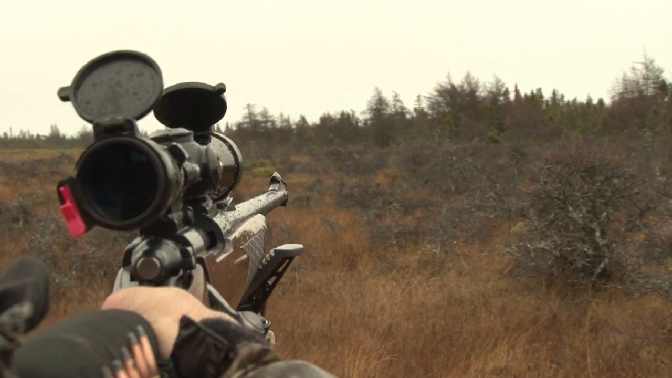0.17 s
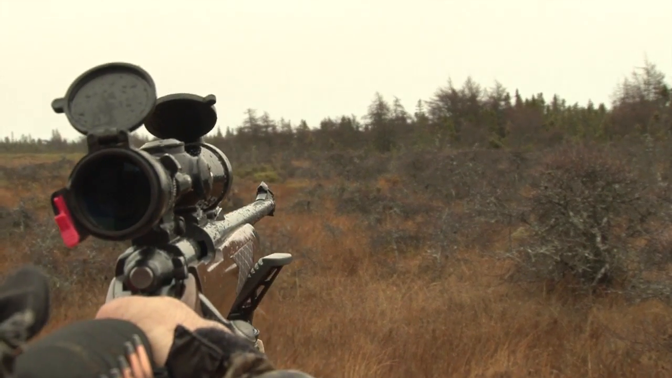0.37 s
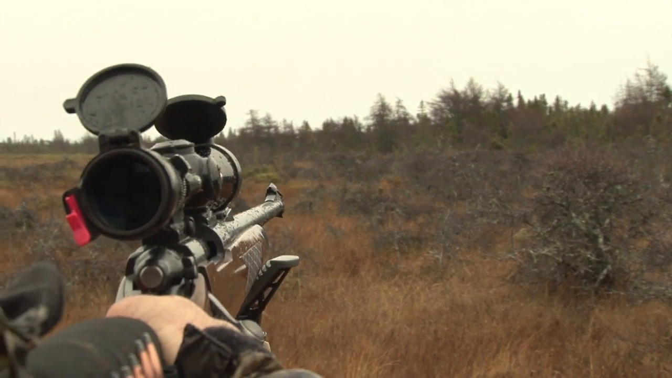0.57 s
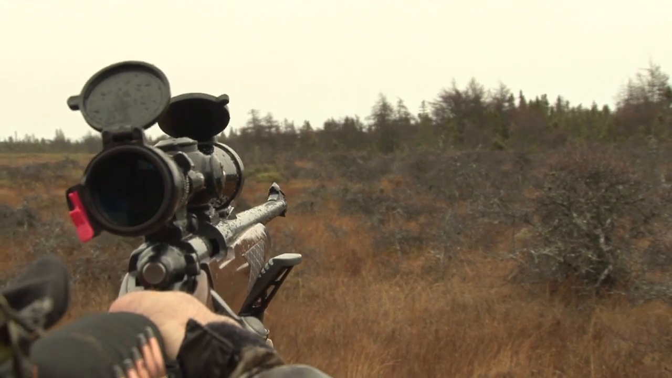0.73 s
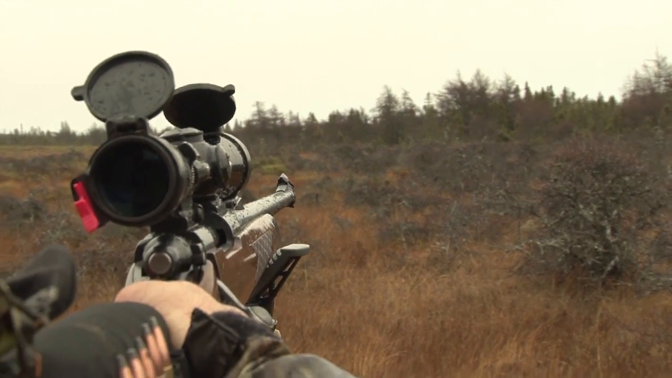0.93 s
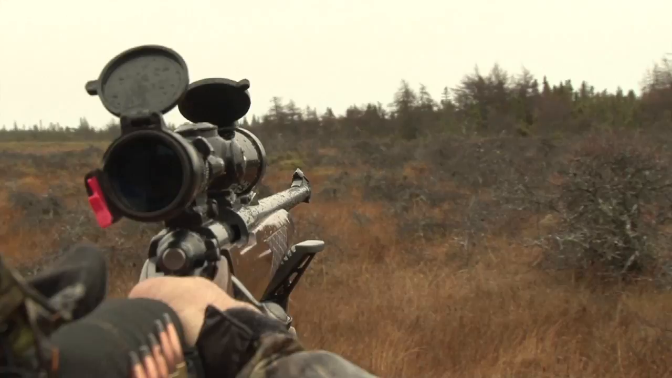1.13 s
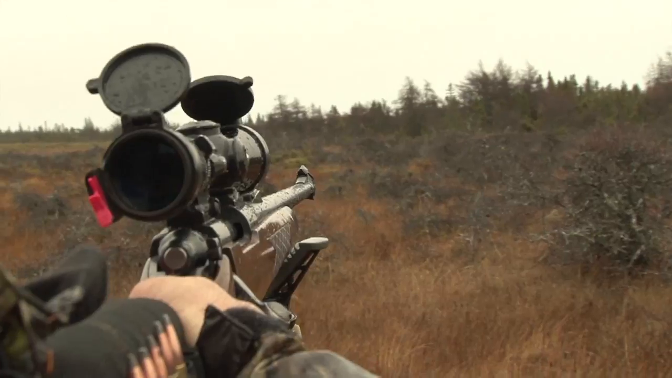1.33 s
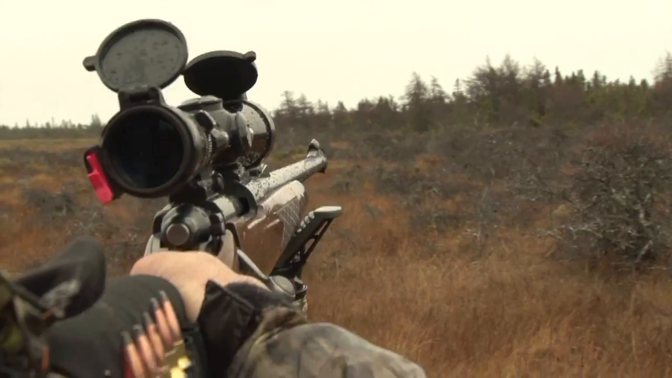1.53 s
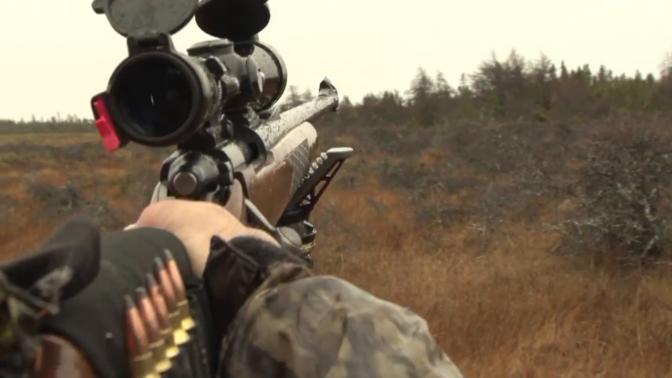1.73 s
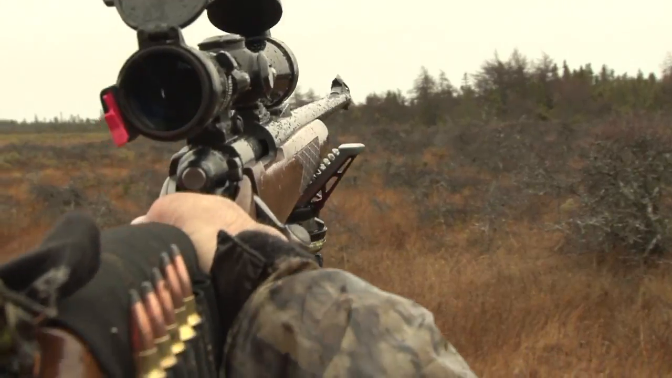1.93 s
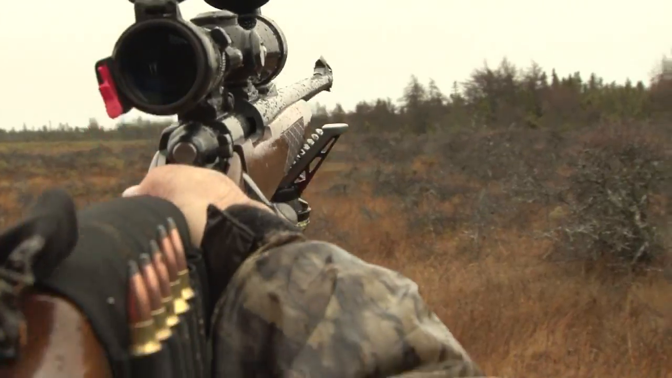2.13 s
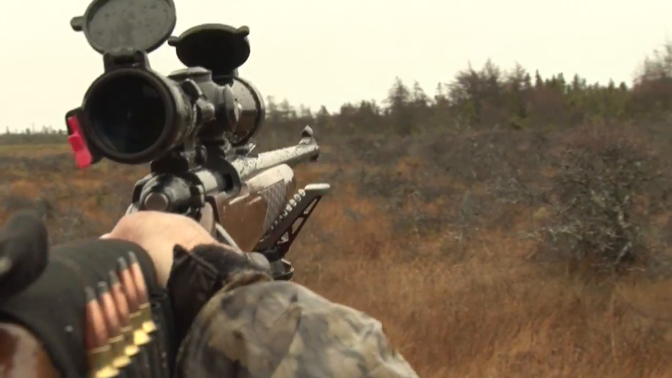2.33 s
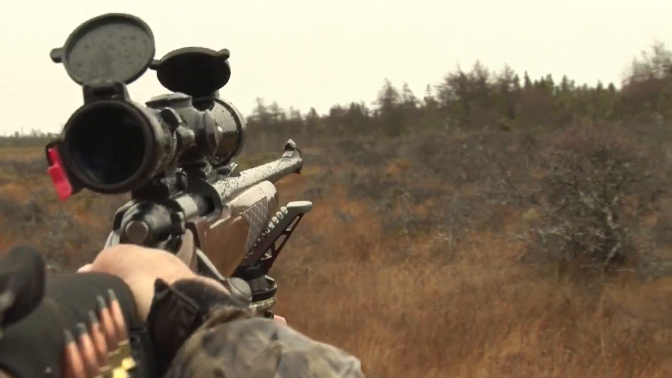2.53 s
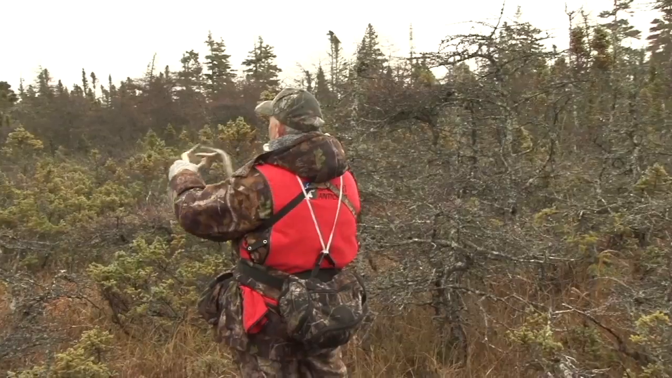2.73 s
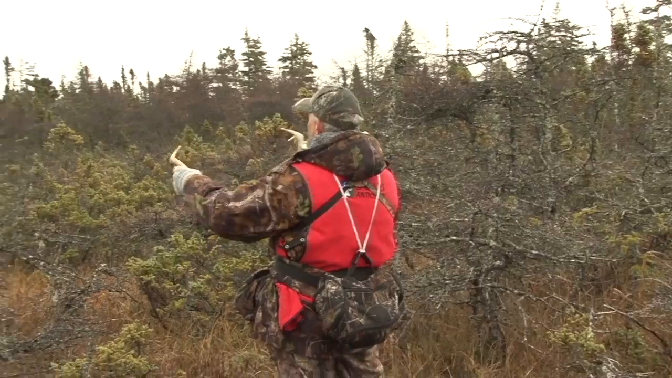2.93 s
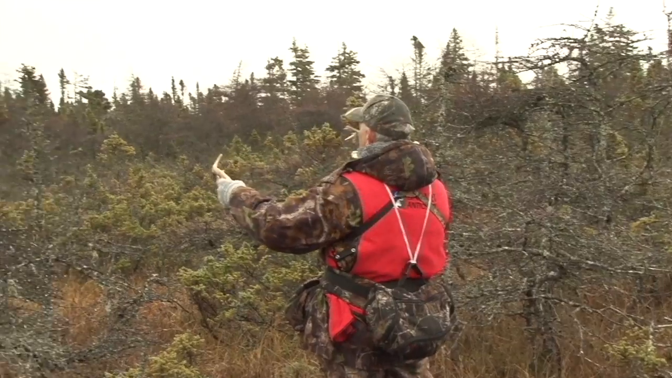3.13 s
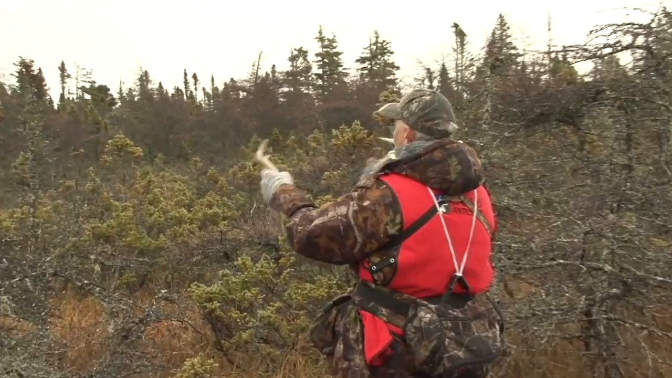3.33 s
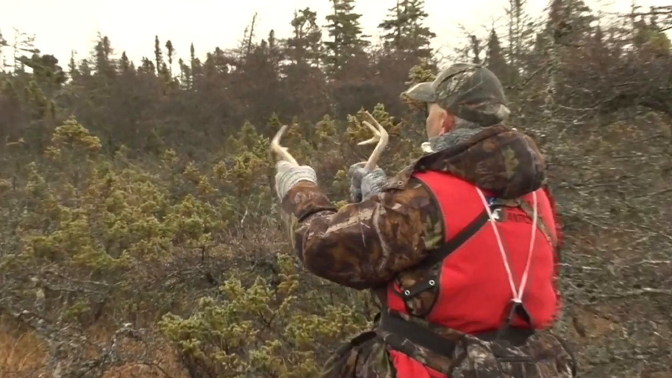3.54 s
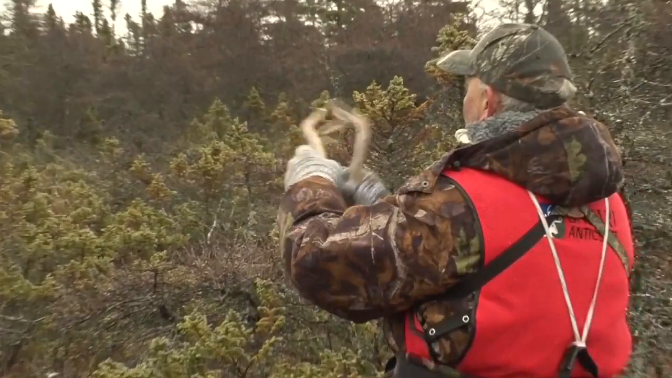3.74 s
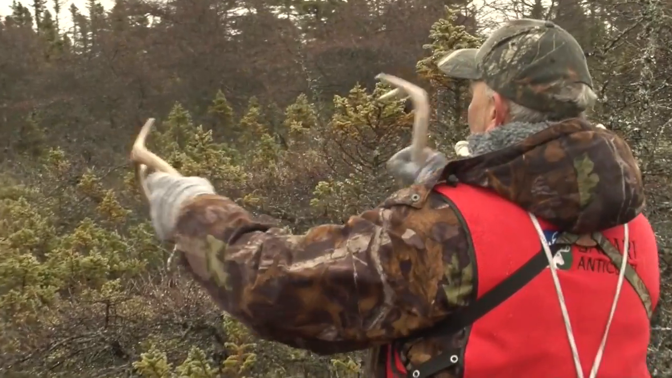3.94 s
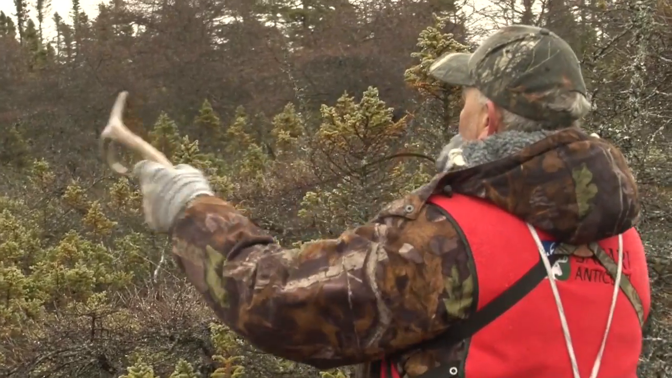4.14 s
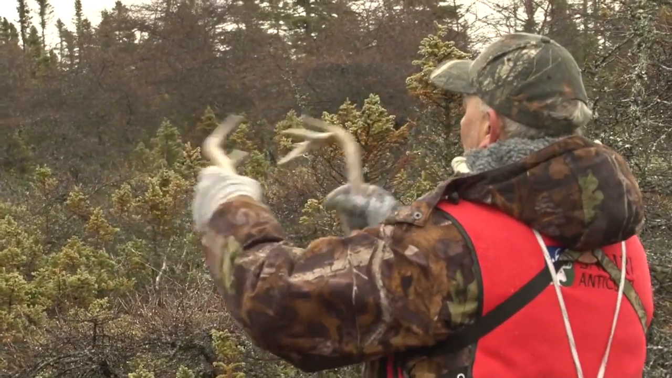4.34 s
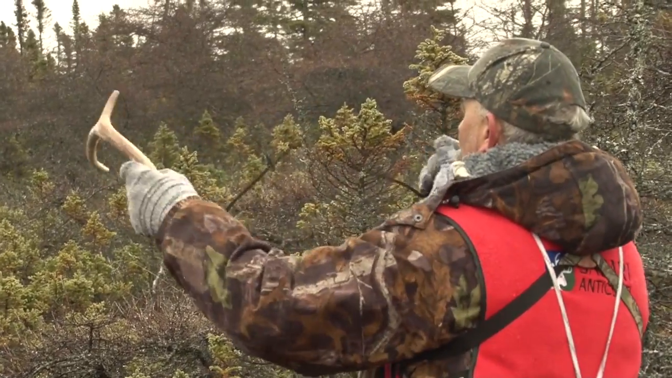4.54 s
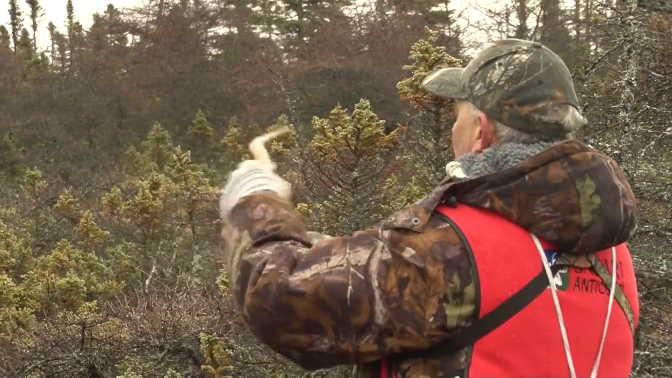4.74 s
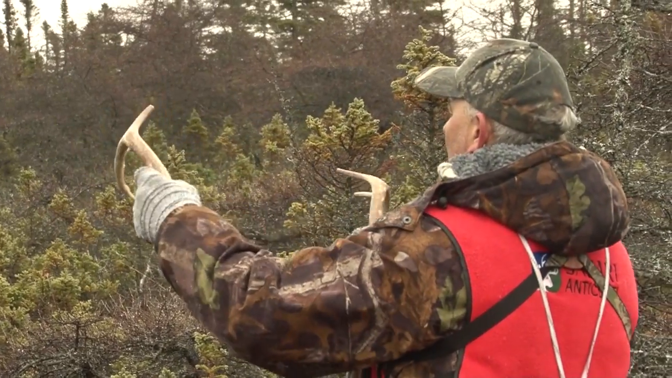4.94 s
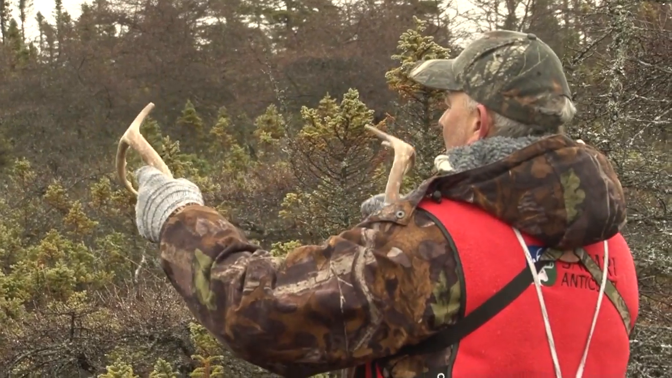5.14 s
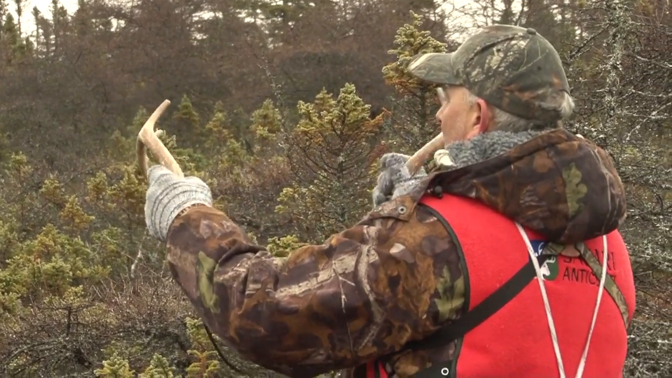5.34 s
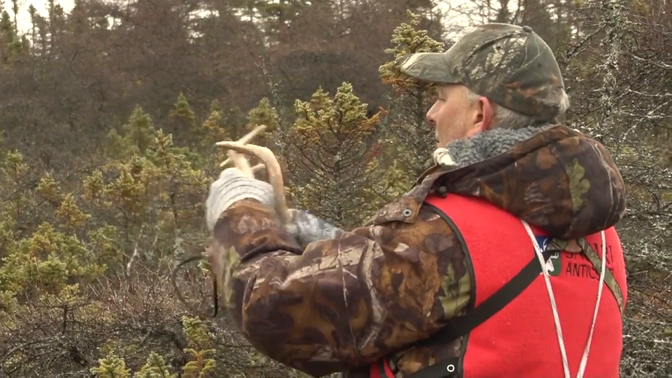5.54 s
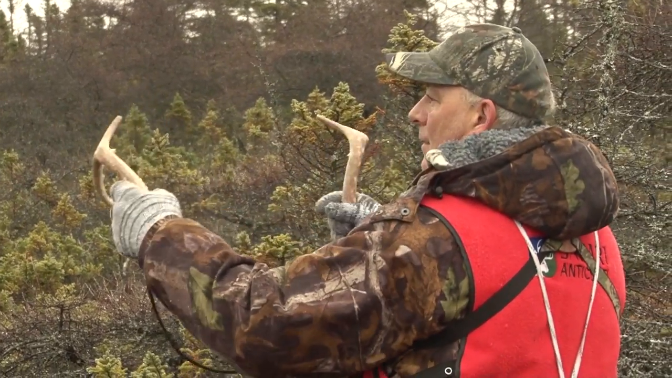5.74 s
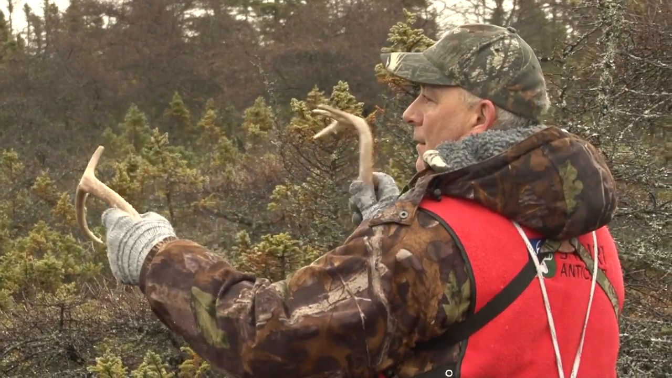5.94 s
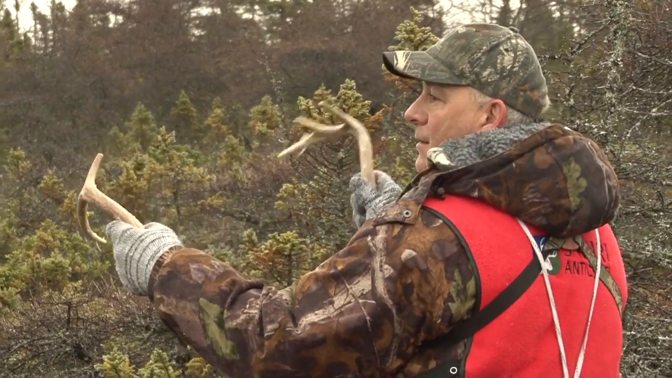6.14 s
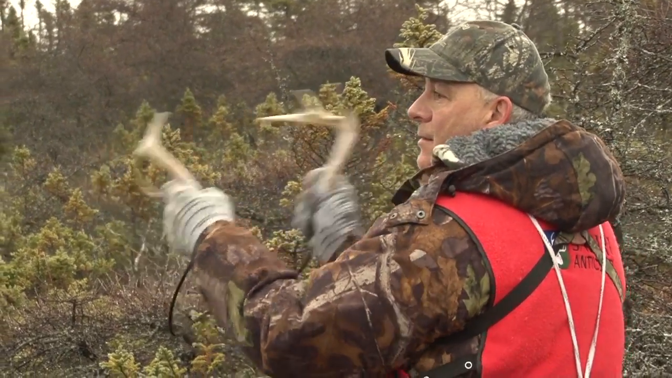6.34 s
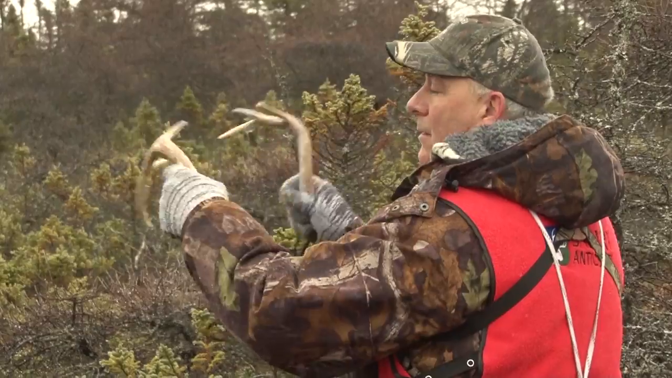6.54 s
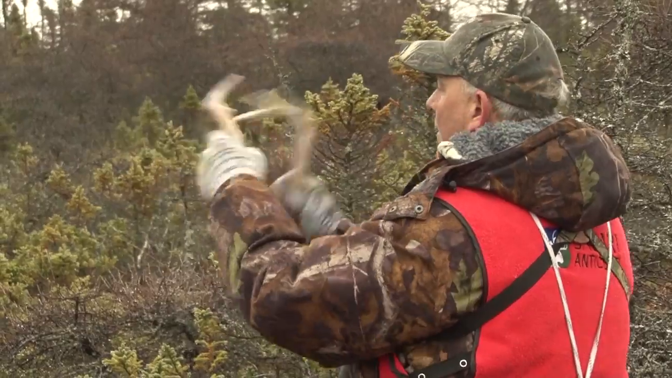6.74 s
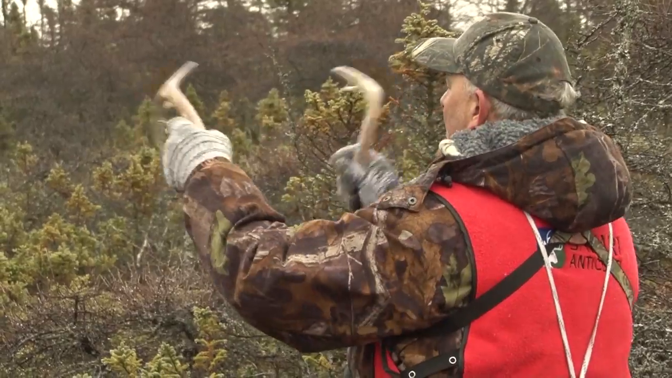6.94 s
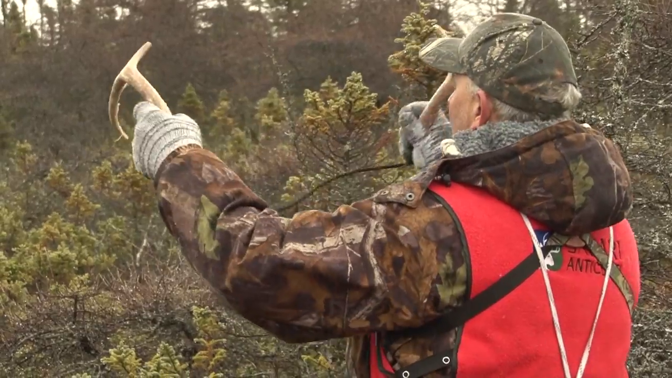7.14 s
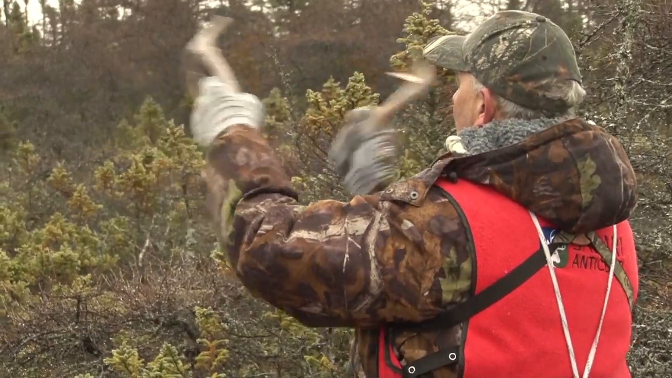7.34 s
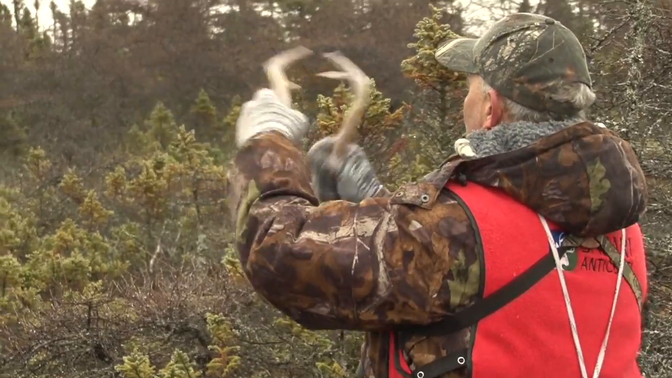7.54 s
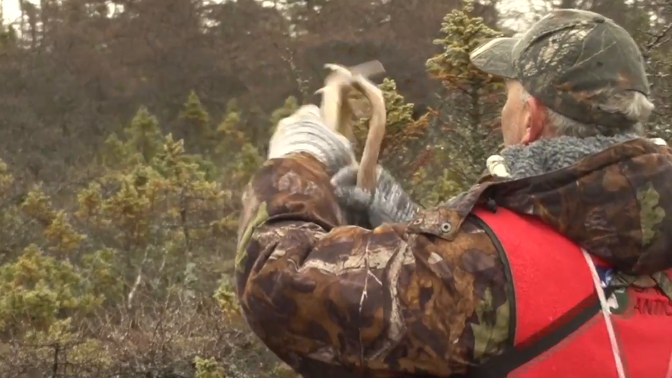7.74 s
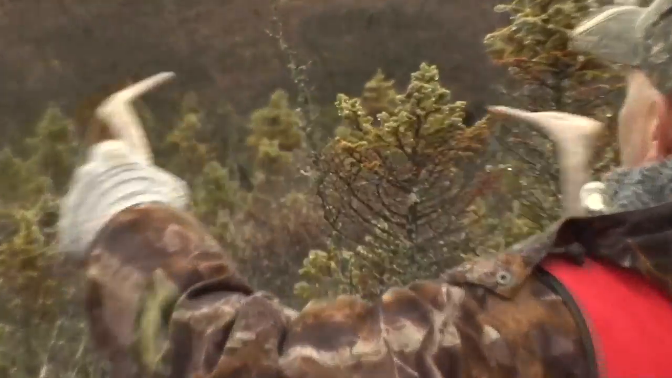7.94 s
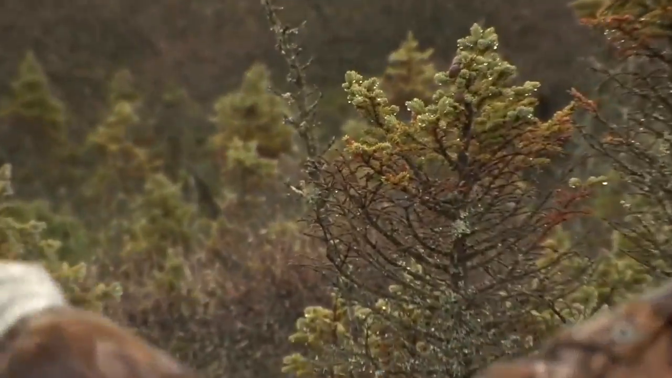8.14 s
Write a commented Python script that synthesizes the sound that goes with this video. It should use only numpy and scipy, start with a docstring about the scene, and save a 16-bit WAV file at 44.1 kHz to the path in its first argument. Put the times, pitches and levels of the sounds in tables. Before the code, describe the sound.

Light rain ticks irregularly on gear and clothing close to the microphone, over faint wind rumble and distant patter. After about two seconds, two antlers start being clashed together a few metres away. Each clash is a quick cluster of sharp, bony clacks with a short tail scattered by the wet brush. The clashes repeat unevenly until near the end, when a soft gust rises.

```python
"""Light rain ticks on gear and clothing close by, over wind rumble, far patter and a cloth hiss.
Two soft swishes pass, and the hiss settles near 2 s. Then two deer antlers are clashed by hand,
again and again, a few metres off in wet brush: each clash is a cluster of tine impacts that excite
the bone's normal modes, and the brush scatters a short tail. A last swish and a gust follow at 8 s."""
import sys
import numpy as np
from scipy import signal
from scipy.fft import rfft, irfft, next_fast_len
from scipy.io import wavfile
from scipy.ndimage import uniform_filter1d

SR = 44100
rng = np.random.default_rng(int(sys.argv[2]) if len(sys.argv) > 2 else 0)


def int16_out(signal):
    """Quantize to a 16-bit WAV file."""
    q = np.round(np.clip(np.atleast_2d(signal).T, -1, 1) * 32767)
    wavfile.write(sys.argv[1], SR, q.astype(np.int16))


N = 365456
TIME_S = np.arange(N) / SR


def undb(db):
    """Decibels to amplitude ratio."""
    return 10 ** (np.asarray(db) / 20)


def unit(x):
    """Normalise to rms 1."""
    return x / np.sqrt(np.mean(x ** 2))


def shape(x, points):
    """Zero-phase filtering through (frequency_hz, gain_db) points, with steep skirts outside them."""
    hz, db = np.transpose(points)
    size = next_fast_len(x.shape[-1], True)
    log_f = np.log(np.fft.rfftfreq(size, 1 / SR) + 1)
    outside = np.maximum(np.log(hz[0]) - log_f, 0) + np.maximum(log_f - np.log(hz[-1]), 0)
    gain_db = np.interp(log_f, np.log(hz), db) - 40 * outside
    return irfft(rfft(x, size) * undb(gain_db), size)[..., :x.shape[-1]]


def noise_pair(correlation):
    """Partial coherence: left and right noise share a common part."""
    mid, side = rng.standard_normal((2, N)) * np.sqrt([[1 + correlation], [1 - correlation]])
    return np.array([mid + side, mid - side])


def flicker(x, level_db, rate_hz, depth_db):
    """Random amplitude modulation: the level wanders smoothly about level_db."""
    hold = int(SR / rate_hz)
    steps = np.repeat(rng.standard_normal(N // hold + 1), hold)
    wander = 1.4 * uniform_filter1d(uniform_filter1d(steps, hold), hold)[:N]  # spread near 1
    return unit(x) * undb(level_db + depth_db * wander)


def add(out, start_s, sound):
    """Superpose a short stereo sound on the mix."""
    i = int(start_s * SR)
    out[:, i:i + sound.shape[1]] += sound[:, :N - i]


# Gust envelope: time_s, rumble_db, leaves_db
GUST_LEVELS = [(0, -66, -70.5), (.9, -67, -68.5), (1.35, -60.5, -71), (2.1, -67.5, -72), (2.6, -66, -70.5),
               (3.299, -58.5, -60), (3.6, -61, -71), (4.15, -61.5, -63), (5.2, -60, -71),
               (5.701, -60.5, -60), (6.25, -58.5, -67), (6.55, -55.5, -55.5), (7.1, -60.5, -66),
               (7.7, -61.5, -63), (8.05, -63.5, -65), (8.29, -51.5, -61)]

def wind():
    """Turbulence: gusts rumble on the microphone ports and rush through the brush."""
    time_s, rumble_db, leaves_db = np.transpose(GUST_LEVELS)
    rumble = shape(noise_pair(-0.25), [(25, -0.5), (65, 4.5), (170, -5)])
    leaves = shape(noise_pair(0.85), [(200, 0.5), (280, 4.5), (360, -8.5)]) * undb([[-1], [1]])
    return (flicker(rumble, np.interp(TIME_S, time_s, rumble_db), rate_hz=9, depth_db=2)
            + flicker(leaves, np.interp(TIME_S, time_s, leaves_db), rate_hz=10, depth_db=2))


# Spectrum of far rain: frequency_hz, gain_db
PATTER_SPECTRUM = [(450, 2.5), (600, 2), (1000, -2.5), (1600, -2), (2500, -13), (3700, -17), (5000, -21),
                   (7000, -25.5), (9500, -34), (14000, -42)]

def far_rain():
    """Many distant impacts merge into a spiky noise with log-normal amplitudes."""
    spikes = noise_pair(0.7) * undb(7.5 * rng.standard_normal(N))
    return flicker(shape(spikes, PATTER_SPECTRUM), level_db=-64.5, rate_hz=25, depth_db=1.2)


# Spectrum of moving cloth: frequency_hz, gain_db
CLOTH_SPECTRUM = [(3000, -8.5), (4300, -3), (5200, -13), (6900, -5), (8500, -13), (9900, -6.5),
                  (12500, -19.5), (14500, -14.5), (16500, -21.5)]

def cloth():
    """Friction noise: moving cloth hisses, then settles to a lower level."""
    level_db = np.interp(TIME_S, [1.85, 2.15], [-75.5, -87.5])
    return flicker(shape(noise_pair(0.35), CLOTH_SPECTRUM), level_db, rate_hz=5, depth_db=1)


# Soft swishes: peak_s, rise_s, band_hz, level_db
SOFT_SWISHES = [(1.12, 0.13, 6960, -71), (1.3, 0.18, 3000, -69), (8.163, 0.056, 3900, -65)]

def swishes():
    """Band-limited noise swells and fades under a sine-squared envelope."""
    out = np.zeros((2, N))
    for peak_s, rise_s, hz, db in SOFT_SWISHES:
        t = np.arange(int(2 * rise_s * SR)) / SR
        noise = rng.standard_normal((2, len(t))) + 1.9 * rng.standard_normal(len(t))
        band = unit(shape(noise, [(hz / 1.4, 0), (hz * 1.08, 0)]))
        add(out, peak_s - rise_s, undb(db) * band * np.sin(np.pi * t / (2 * rise_s)) ** 2)
    return out


def drop(hz, splash_db, noise):
    """Impact on a heavily damped surface: about one cycle of ring, a thud, a rattle and a wet tick."""
    t = np.arange(len(noise)) / SR
    phase = 2 * np.pi * hz * t
    envelope = np.exp(-t * hz / 0.8) * (1 - np.exp(-(3.5 * t * hz) ** 2))
    second = undb(-3) * np.sin(1.815 * phase + 3 * noise[0])
    third = undb(-8) * np.sin(3.01 * phase + 3 * noise[1])
    ring = envelope * (np.sin(phase) + second + third)
    thud = np.exp(-t / 0.00041) * np.sin(0.52 * phase)
    span = int(SR / hz / 5)
    dull_noise = uniform_filter1d(uniform_filter1d(noise, span), span) * np.sqrt(span)
    rattle = dull_noise * np.exp(-t / 0.0029) * np.minimum(t * hz, 1)
    tick = np.diff(noise, prepend=0) * np.exp(-t / 0.0012)
    sound = ring + undb(-10) * thud + undb(-16) * rattle + undb(splash_db) * tick
    return sound / np.abs(sound).max()


# Colouring of all near drops: frequency_hz, gain_db
DROP_SPECTRUM = [(130, 2.5), (300, 2), (500, 2.5), (4300, 0), (5100, -7), (6900, -4.5), (8600, -12.5),
                 (10000, -20.5), (13000, -26), (16000, -21.5)]
# Near drops before colouring: start_s, peak_db, pitch_hz, splash_re_ring_db, left_minus_right_db
NEAR_DROPS = [(0.067, -22, 2260, 1, 7), (0.1, -31.5, 700, -8, 3), (0.147, -33.5, 1120, -5.5, -7.5),
              (0.27, -25, 2550, -1.5, 2), (0.389, -40, 1530, -30, 5), (0.417, -38, 1280, -28, -4),
              (0.458, -39, 1750, -28, -9), (0.532, -40, 1190, -23, -9), (0.565, -49, 1510, -31, 1),
              (0.606, -25, 1850, -40, 4.5), (0.617, -41, 1460, -32, 7), (0.762, -18.5, 1980, -12, 2),
              (0.781, -35.5, 1330, -22, 3), (0.796, -37.5, 2020, -23, 4), (0.858, -30.5, 1370, -33, -8),
              (0.875, -27.5, 930, -14.5, -10.5), (0.915, -30.5, 2320, -6, 3), (1.03, -31, 1330, -8, -7.5),
              (1.053, -28, 2150, -32, 3.5), (1.129, -28.5, 1870, -11, -4.5), (1.378, -37, 576, -27, 1),
              (1.416, -25, 2200, -38, 3), (1.505, -20.5, 1090, -15, 3.5), (1.511, -31.5, 1590, -23, -9),
              (1.636, -37, 1550, -27, -3), (1.786, -27, 1560, -6, -3.5), (1.858, -30.5, 2000, -10, 5),
              (1.926, -37.5, 1170, -34, -2), (1.953, -23.5, 1454, -46, 4.5), (2.041, -34.5, 1010, -21, -9),
              (2.055, -30, 1320, -15, 4.5), (2.099, -28, 2460, -6, 4), (2.294, -30.5, 1940, -6, 4),
              (2.487, -31.5, 2600, -40, -5), (2.54, -21, 1470, -5, 3), (2.649, -30, 1260, -12, -4),
              (2.705, -26, 1010, -8.5, -8), (2.828, -19, 1590, -7, 3), (2.893, -18, 860, -6.5, 3),
              (2.958, -24, 906, -10.5, -3.5), (3.045, -35.5, 2400, -31, 3), (3.152, -28, 1048, -10, -5.5),
              (3.178, -33, 740, -17, -16), (3.293, -37, 1360, -22, -9), (3.299, -32.5, 1750, -16, -4.5),
              (3.341, -38, 1050, -13, -5), (3.371, -40.5, 1430, -29, -4), (3.578, -24.5, 1540, 0, 0),
              (3.789, -29.5, 1330, -15, 5), (3.921, -21, 1230, -9, 0), (4.121, -29.5, 525, -9.5, -7),
              (4.131, -30, 1320, -11, 7), (4.161, -37, 2170, -32.5, 6), (4.507, -27, 950, -32, 6),
              (4.558, -9.5, 1240, -11, 3), (4.589, -36.5, 990, -21, -6), (4.622, -29.5, 1330, -10, 4.5),
              (4.632, -32, 2100, -34, -4), (4.685, -40.5, 780, -37, -8), (4.864, -15.5, 1410, 2.5, 0.5),
              (4.95, -33, 1400, -17, -3), (5.013, -30.5, 1930, -24, -8.5), (5.07, -36.5, 1630, -22, 3),
              (5.235, -37, 1380, -29.5, 4), (5.266, -34.5, 1196, -29, -14), (5.405, -42, 1860, -14, 5),
              (5.463, -17, 1670, -17.5, 4), (5.56, -33.5, 1410, -13, -8), (5.68, -38, 716, -19, -.5),
              (5.734, -38, 1100, -30, -7), (5.79, -31, 1230, -1.5, -3), (5.873, -25, 970, -3.5, -8),
              (5.972, -29.5, 2570, -25, 4.5), (6.169, -22.5, 975, -6, 4), (6.206, -38, 2000, -19, -4),
              (6.214, -32.5, 1460, -14, -6), (6.234, -32.5, 1430, -13, -10), (6.333, -25.5, 920, -12, -7),
              (6.342, -28, 1520, -14.5, 4.5), (6.406, -40, 1260, 1, -5), (6.42, -27, 1900, -20, 4),
              (6.544, -25, 2470, -8, 5), (6.771, -41, 910, -27, -2), (7.087, -30.5, 1600, -18.5, -4.5),
              (7.148, -36.5, 1670, -46, 2), (7.286, -26.5, 1176, -13, -8.5), (7.325, -45, 1390, -34, -5),
              (7.368, -40.5, 2840, -17, 7), (7.454, -40.5, 2300, -24, 1), (7.547, -32, 1500, -22, 5),
              (7.602, -25.5, 1670, -17, 7.5), (7.648, -29, 1700, -26, -6), (7.832, -12.5, 1060, -7.5, -7.5),
              (7.998, -42, 816, -32, -3.5), (8.084, -39.5, 1120, -11, 3), (8.132, -41, 1440, -21, -1),
              (8.242, -38.5, 1580, -25, -4)]

def near_rain(small_drops=420):
    """Drop impacts excite gear and clothing: distinct ticks amid a random crowd of smaller ones."""
    out, sides = np.zeros((2, N)), np.array([[0.5], [-0.5]])
    for start_s, db, hz, splash_db, pan_db in NEAR_DROPS:
        add(out, start_s, undb(db + sides * pan_db) * drop(hz, splash_db, rng.standard_normal(600)))
    for noise in rng.standard_normal((small_drops, 400)):
        splash, pitch, size, pan = noise[-4:]
        db = -57 + 7.5 * abs(size) + sides * 4 * pan
        sound = drop(1300 * np.exp(0.43 * pitch), -23 + 9 * splash, noise)
        add(out, rng.random() * N / SR, undb(db) * sound)
    return shape(out, DROP_SPECTRUM)


# Scattered tail before colouring: band_hz, t60_s, level_re_contact_db
TAIL_BANDS = [(640, 0.28, -24.5), (950, 0.35, -24.5), (1470, 0.56, -32), (2100, 0.63, -19),
              (2860, 0.15, -19), (4400, 0.5, -12.5), (6500, 0.4, -11.5), (9500, 0.14, -12.5),
              (13480, .15, -20)]

def brush_echoes(rise_s=0.0017, early_s=0.0085, early_db=12, colour_share=0.72):
    """Scattering by twigs and ground: echo energy decays exponentially, near echoes fastest."""
    start_s, family_db = contacts()
    tail, early = 0, undb(2 * early_db)
    for hz, t60_s, db in TAIL_BANDS:
        power = np.zeros(N)
        power[(start_s * SR).astype(int)] = undb(2 * family_db[:, np.searchsorted(FAMILY_EDGES, hz)])
        decay = lambda tau_s: signal.lfilter([1], [1, -np.exp(-1 / (tau_s * SR))], power)
        build_up = (1 + early) * decay(min(rise_s, 0.8 * early_s, t60_s / 15))
        energy = decay(t60_s / np.log(1e6)) + early * decay(early_s) - build_up
        band = unit(shape(noise_pair(0.77), [(hz / np.sqrt(1.5), 0), (hz * np.sqrt(1.5), 0)]))
        tail += undb(db) * band * np.sqrt(np.maximum(energy, 0))
    # the echoes keep part of the colour of the bone modes
    f = np.geomspace(200, SR / 2, num=400)
    resonances = sum(undb(2 * db) / (1 + (2 * (f - hz) / width) ** 2) for hz, width, db in BONE_MODES)
    return shape(tail, np.transpose([f, colour_share * 10 * np.log10(resonances)]))


# Tine impacts, rms over the first 3 ms: start_s, beam_db, main_ring_db, tines_db
TINE_CONTACTS = [(2.1408, -35.5, -22, -18.5), (2.1441, -26, -15.5, -28), (2.148, -24, -22, -23),
                 (2.1713, -43, -30, -43), (2.1768, -45, -26.5, -43), (2.7413, -30.5, -13.5, -20),
                 (2.7453, -34, -18.5, -51), (2.767, -49, -27, -31.5), (2.7707, -35, -27, -32),
                 (3.4897, -26, -38, -19), (3.4934, -21, -14.5, -27.5), (3.496, -29, -20, -22),
                 (3.5155, -39, -27, -51), (3.568, -45, -38, -40.5), (3.691, -29, -22.5, -25.5),
                 (3.7192, -33.5, -23.5, -32.5), (3.739, -44, -32.5, -50), (3.7554, -45, -44, -37),
                 (3.8427, -55, -50, -40), (3.8458, -39.5, -37, -35.5), (3.8556, -36, -38, -28),
                 (3.86, -28, -18, -22.5), (3.8657, -28.5, -23, -38), (3.8787, -45, -32, -43),
                 (4.3336, -42, -49, -21), (4.3346, -21, -13, -17), (4.3603, -31.5, -27, -34),
                 (4.7728, -31, -23.5, -28), (4.7767, -25, -14.5, -20), (4.782, -34, -30.5, -26.5),
                 (4.7935, -51, -44.5, -34), (5.585, -29, -48, -37), (5.591, -23.5, -13.5, -21.5),
                 (5.6206, -58, -33, -40), (5.6317, -38.5, -29, -50), (6.4776, -28, -42, -31),
                 (6.4794, -37, -22.5, -23.5), (6.482, -24, -28.5, -26.5), (6.4983, -40, -23, -28.5),
                 (6.8545, -34, -45, -27.5), (6.858, -24, -29, -29), (6.8832, -34.5, -35, -27.5),
                 (6.932, -28, -30, -39.5), (6.9404, -35.5, -34, -35), (7.4771, -23.5, -25, -38),
                 (7.4781, -26, -24, -27), (7.4815, -22.5, -20, -55), (7.4901, -36, -29, -26),
                 (7.5144, -48, -33, -35.5), (7.66, -50, -33.5, -39), (7.668, -25, -15.5, -22.5),
                 (7.673, -31, -40, -35), (7.6816, -43, -30, -35), (7.8456, -29, -27, -24),
                 (7.8512, -29.5, -50, -30)]

def contacts(hard_db=-18.5):
    """Harder impacts are brighter: start times and four family levels, the last a surface crack."""
    start_s, beam_db, ring_db, tines_db = np.transpose(TINE_CONTACTS)
    surface_db = tines_db - 7.5 + 0.35 * (tines_db - hard_db)
    return start_s, np.column_stack([beam_db, ring_db, tines_db, surface_db])


# Borders between the beam, main ring, tine and surface mode families: frequency_hz
FAMILY_EDGES = [1200, 1700, 3600]
# Directivity of each family: left_minus_right_db
FAMILY_PAN = [0.047, 1.1, 1.5, -0.31]
# Normal modes of the antlers: frequency_hz, bandwidth_hz, relative_db
BONE_MODES = [(264, 28, 11.5), (581, 60, -7), (780, 71, -24.5), (901, 69, 1.5), (1120, 120, -5.5),
              (1330, 44, -23.5), (1460, 67, 4), (1534, 64, -6), (1850, 110, -12.5), (2080, 180, -7.5),
              (2543, 170, -10.5), (2840, 160, -14.5), (3084, 70, -8), (3960, 33, -15), (4404, 150, -15),
              (5080, 570, -22), (5920, 460, -30), (6670, 330, -20), (6980, 170, -18.5), (7660, 770, -32),
              (9810, 380, -26), (11500, 1000, -43.5), (13600, 1500, -50.5)]

def antlers(scatter_db=4, detune=0.017, spread_db=2.5, grit_db=-10, grit_s=0.00059):
    """Modal superposition: every impact rings the same modes; the spot struck weights each family."""
    out, t = np.zeros((2, N)), np.arange(2000) / SR
    hz, width, db = np.transpose(BONE_MODES)
    in_family = np.searchsorted(FAMILY_EDGES, hz) == np.arange(4)[:, None]
    variations = rng.standard_normal((len(TINE_CONTACTS), 4, len(hz)))
    roughness = rng.standard_normal((len(TINE_CONTACTS), 130))
    radiation = signal.butter(6, 513, "high", fs=SR, output="sos")  # thin bone radiates little bass
    for start_s, family_db, variation, grit in zip(*contacts(), variations, roughness):
        polarity, strength, tuning, direction = variation
        sign = np.where(in_family[1], 1, np.sign(polarity))  # the main ring starts in phase
        amplitude = sign * width * undb(db + scatter_db * strength)
        envelopes = amplitude[:, None] * np.exp(-np.pi * np.outer(width, t))
        modes = envelopes * np.sin(2 * np.pi * np.outer(hz * (1 + detune * tuning), t))
        pan_db = (FAMILY_PAN @ in_family + spread_db * direction) / 2  # each mode radiates its own way
        families = (in_family[:, None] * undb([pan_db, -pan_db])) @ modes
        force = undb(grit_db) * grit * np.exp(-t[:len(grit)] / grit_s)  # ridged surfaces chatter
        force[0] = 1  # the impact itself
        families = signal.sosfilt(radiation, signal.lfilter(force, [1], families))
        onset_rms = np.std(families[:, :, :int(0.003 * SR)], axis=(1, 2))
        add(out, start_s, np.tensordot(undb(family_db) / onset_rms, families, 1))
    return out


def scene():
    """Linear superposition: the pressures of all sources add."""
    return antlers() + brush_echoes() + near_rain() + wind() + far_rain() + cloth() + swishes()


# Housing reflection at the left and right port: centre_hz, bandwidth_hz, depth_ratio
PORT_REFLECTIONS = [(5480, 200, 0.2), (4884, 380, 2.3)]

def record(dry, cutoff_hz=16300):
    """Interference near 5 kHz dips the left port and inverts the right; a low-pass cuts the top."""
    ports = []
    for x, (hz, width, depth) in zip(dry, PORT_REFLECTIONS):
        b, a = signal.iirpeak(hz, hz / width, fs=SR)
        ports.append(x - depth * signal.lfilter(b, a, x))
    return signal.sosfilt(signal.ellip(10, 0.2, 70, cutoff_hz, fs=SR, output="sos"), np.array(ports))


dry = scene()
out = record(dry)
int16_out(out)
```